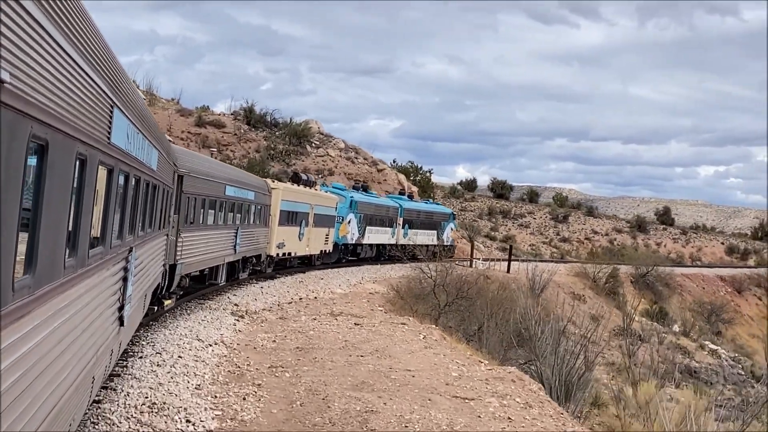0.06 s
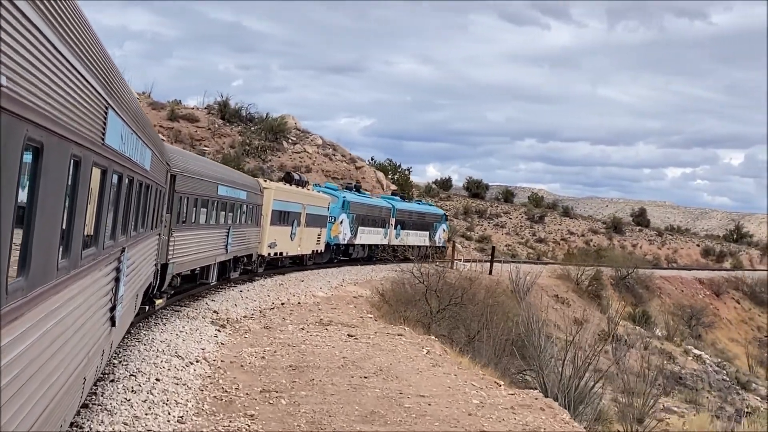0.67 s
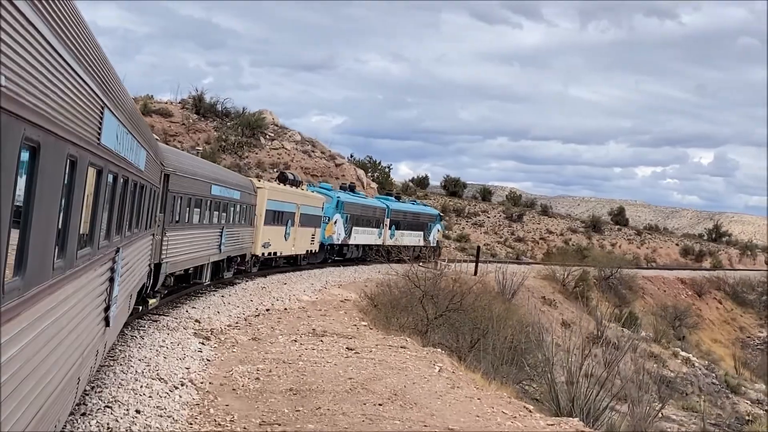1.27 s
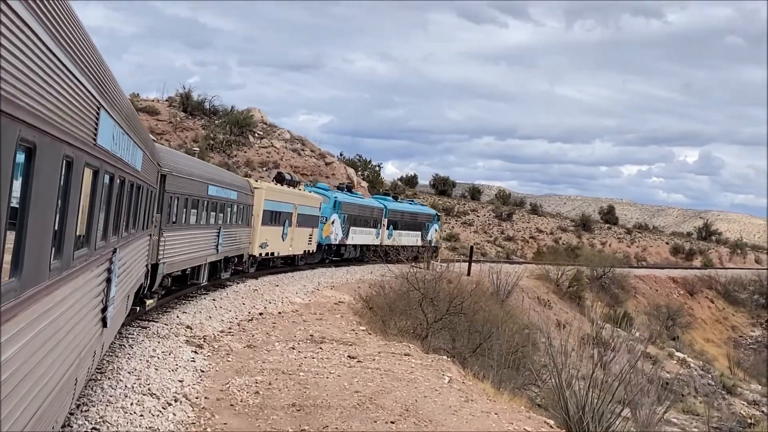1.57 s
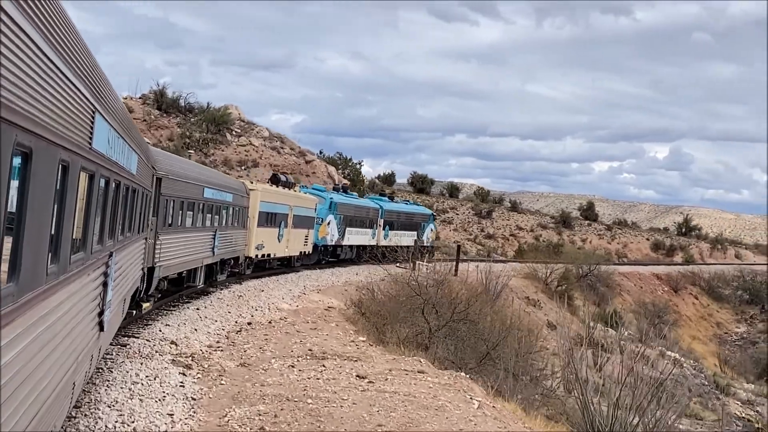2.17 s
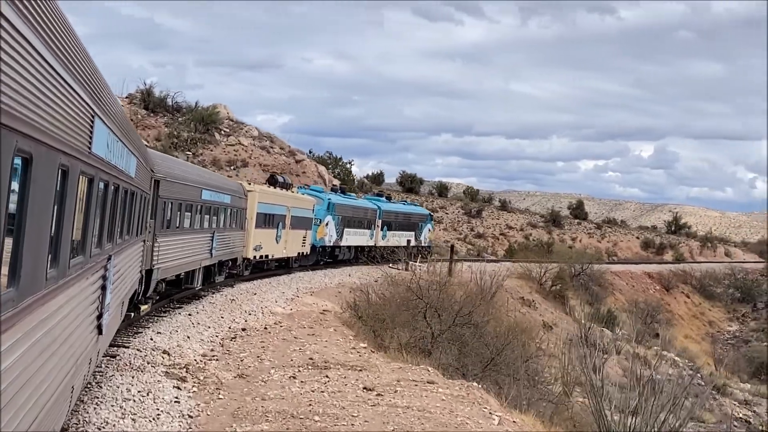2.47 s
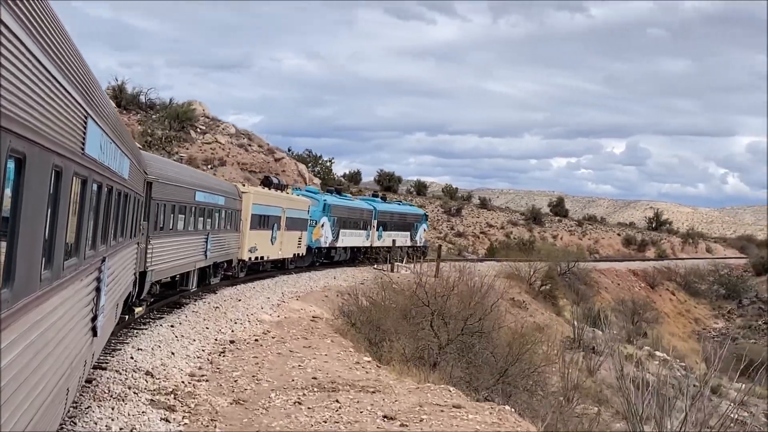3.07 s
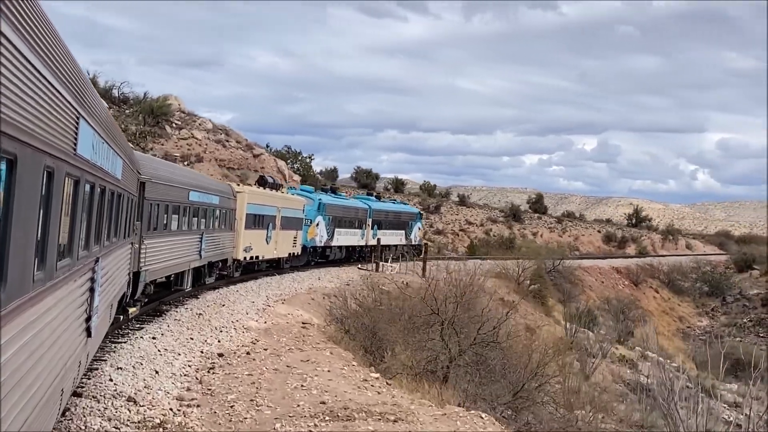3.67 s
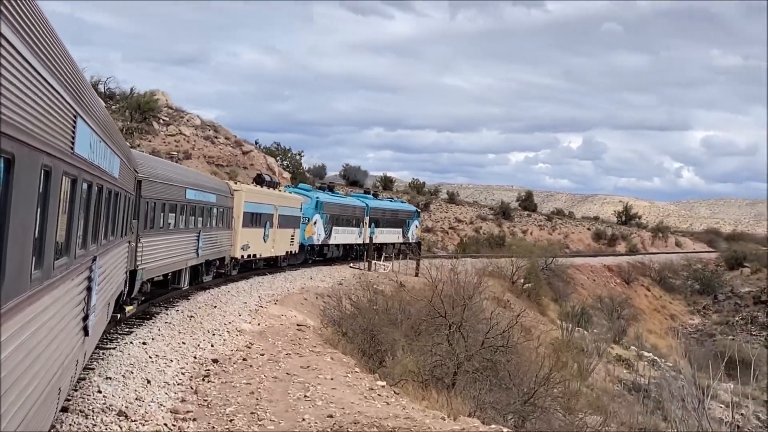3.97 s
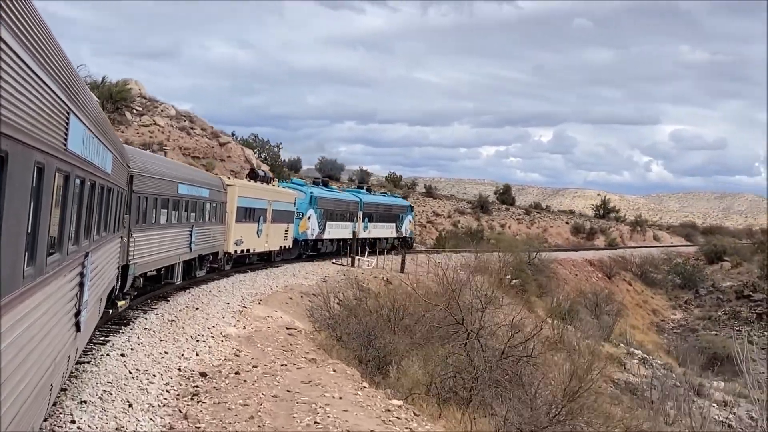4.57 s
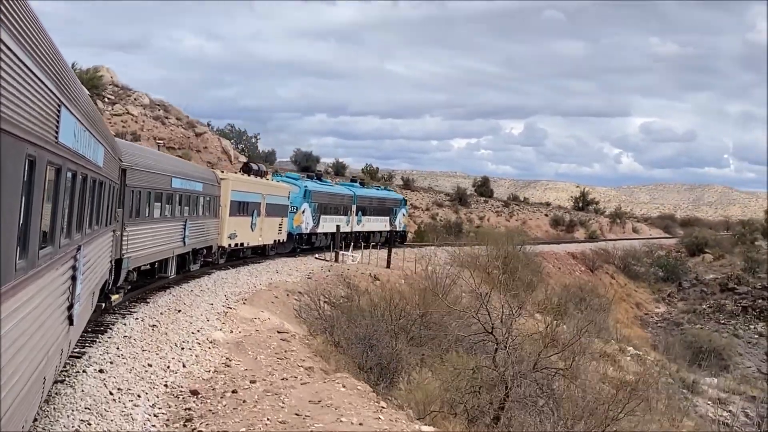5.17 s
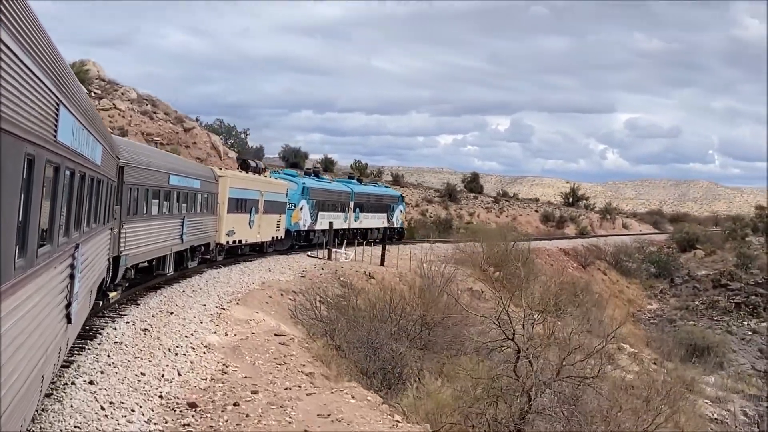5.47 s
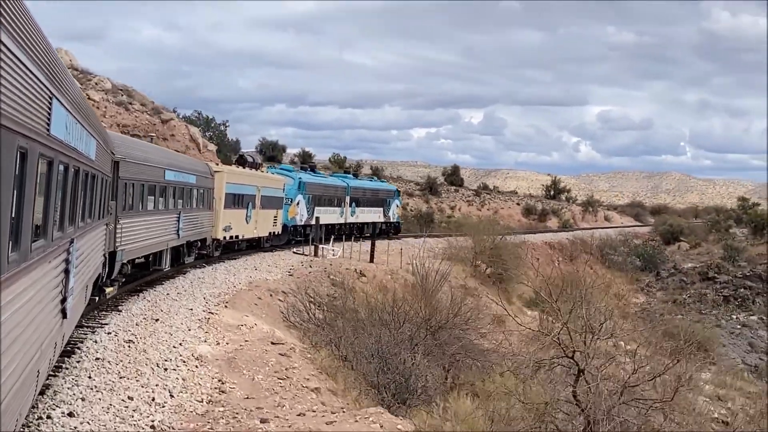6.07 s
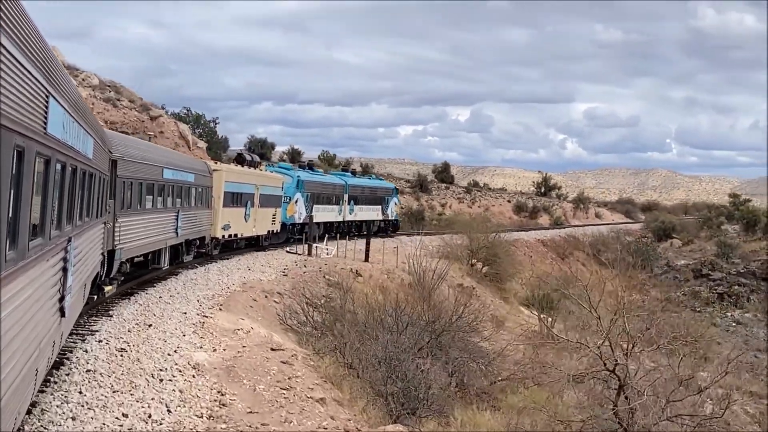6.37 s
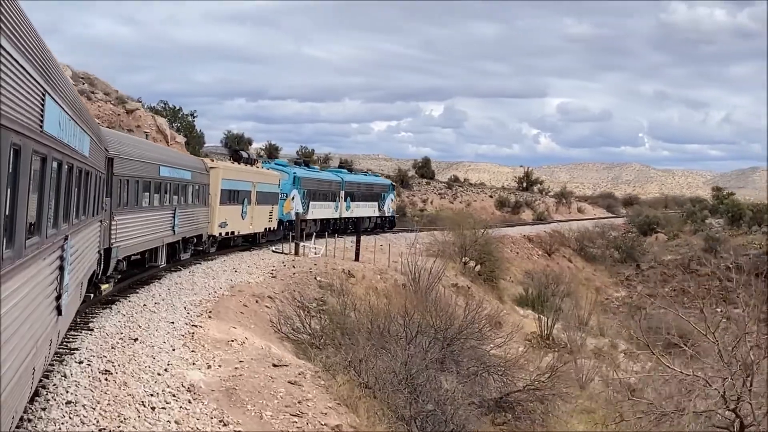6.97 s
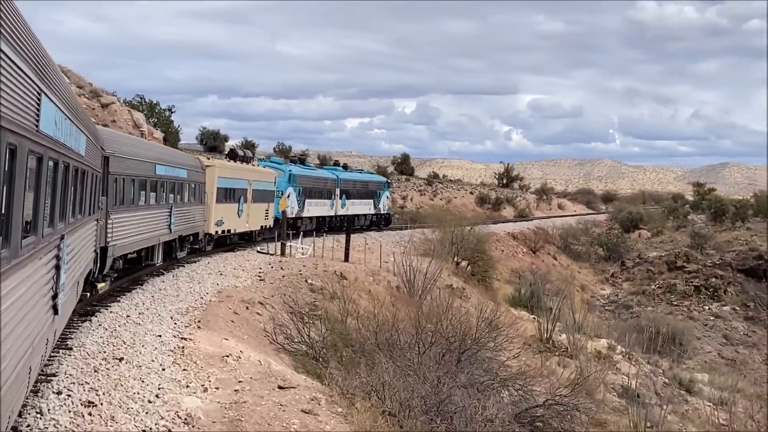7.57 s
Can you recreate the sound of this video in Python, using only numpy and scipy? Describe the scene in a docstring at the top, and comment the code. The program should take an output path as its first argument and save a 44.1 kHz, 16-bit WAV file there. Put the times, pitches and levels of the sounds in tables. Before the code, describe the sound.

A slow passenger train rounds a tight curve in open country, heard leaning out from one of its cars. A loud rush of air swells at the start and dies away. Throughout, a steel wheel squeals at one steady high pitch, fluttering in loudness, with shrill overtones and a faint gritty grinding. Short low groans come and go over the rumble of the cars, and wind buffets the microphone.

```python
"""Train wheels squealing on a curve

A slow passenger train rounds a tight curve in open country, heard leaning out from one of its cars.
A wheel grips and slips on the rail and rings at one steady pitch, heard directly and as ground echoes.
Flanges (the wheels' guiding rims) grind, and a low wheel note groans. A rush of air dies away
at the start; the cars rumble, and wind buffets the microphone."""
import sys
import numpy as np
from scipy import signal
from scipy.fft import rfft, irfft, next_fast_len
from scipy.io import wavfile
from scipy.ndimage import uniform_filter1d

SR = 44100
rng = np.random.default_rng(int(sys.argv[2]) if len(sys.argv) > 2 else 0)


def wav_record(signal):
    """Record a signal, one row per channel, as 16-bit PCM in the file named by sys.argv[1]."""
    frames = np.transpose(np.atleast_2d(signal))
    bounded = np.clip(frames, -1, 1)
    # unit amplitude maps onto the largest positive 16-bit level
    quanta = np.round(bounded * 32767).astype(np.int16)
    wavfile.write(sys.argv[1], SR, quanta)


N = 345303
TIME = np.arange(N) / SR
WHEEL_HZ = 2088.3   # the squealing wheel's main note
USUAL_PRESSURE_DB = -44   # overtone level when the flange presses as usual


def from_db(db):
    """Turn decibels into a gain."""
    return 10 ** (np.asarray(db) / 20)


def rms_one(x):
    """Scale a signal to an average power of 1."""
    return x / np.sqrt(np.mean(np.abs(x) ** 2) + 1e-20)


def in_time(rows):
    """Join a table's points in time: one smooth curve for each column after the first."""
    times, *columns = np.transpose(rows)
    return [np.interp(TIME, times, column) for column in columns]


def at_hz(points, hz):
    """Read a table between its frequencies, with octaves evenly spaced."""
    frequencies, values = np.transpose(points)
    return np.interp(np.log(hz), np.log(frequencies), values)


def hump(centre_s, length_s):
    """A rounded rise and fall of height 1."""
    distance = np.minimum(np.abs(TIME - centre_s) / (.6 * length_s), 4)
    return np.exp(-distance ** 3)


def spells(rows):
    """Loudness curve of events that each swell, hold and fade."""
    return np.sqrt(sum(from_db(db) ** 2 * hump(s, length) for s, length, db in rows) + 1e-18)


def drift(rate_hz, order=2):
    """A random wobble of typical size 1, mostly slower than the given rate."""
    lowpass = signal.butter(order, min(rate_hz, SR / 45), fs=SR / 20, output="sos")
    slow = signal.sosfilt(lowpass, rng.standard_normal(N // 20 + 3002))[3000:]
    return np.interp(np.arange(N) / 20, np.arange(len(slow)), rms_one(slow))


def evened(x, span_s):
    """Take the slow swells out of a sound and keep its fast flutter."""
    power = np.mean(np.abs(np.atleast_2d(x)) ** 2, axis=0)
    return x / np.sqrt(np.maximum(uniform_filter1d(power, int(span_s * SR)), 1e-9))


def stereo_noise(spectrum, side_db, band_hz):
    """Shaped noise: its middle has power 1 inside the band, and side_db sets its width."""
    size = next_fast_len(N)
    hz = np.maximum(np.fft.rfftfreq(size, 1 / SR), 1)
    gain = from_db(at_hz(spectrum, hz))
    gain /= np.sqrt(np.mean(gain ** 2 * (hz > band_hz[0]) * (hz < band_hz[1])))
    mid, side = irfft(rfft(rng.standard_normal((2, size))) * gain, size)[:, :N]
    return mid + from_db(side_db) * side * [[1], [-1]]


def vibration(hz):
    """A steady tone as a turning complex number; its real part is the sound."""
    return np.exp(2j * np.pi * hz * TIME)


def scatter(spread_hz, order=3):
    """A gain that blurs a tone: each echo off the passing ground shifts a little in pitch."""
    return rms_one(drift(spread_hz, order) + 1j * drift(spread_hz, order))


def panned(x, left_db):
    """Make the left side louder than the right."""
    return x * from_db(np.array([[left_db], [-left_db]]) / 2)


def microphone_ports(x):
    """Sound from along the track reaches the microphone's two openings out of step."""
    # how far the left side leads: (frequency [Hz], phase [radians])
    port_phase = [(20, 0), (600, .1), (2090, .69), (3000, -.2), (4200, -.44), (6300, -.69), (7000, .1),
                  (7400, 2), (8400, 2.6), (10000, 3.3), (10600, 4.6), (11200, 6.1), (13200, 6.4),
                  (14400, 9.1), (16000, 9.5)]
    size = next_fast_len(N + 2000)
    lead = at_hz(port_phase, np.maximum(np.fft.rfftfreq(size, 1 / SR), 1))
    return irfft(rfft(x, size) * np.exp(.5j * lead * [[1], [-1]]), size)[:, :N]


def narrow_bass(x, bass_hz=280):
    """The bass draws in to the middle for a while; higher sounds keep their width."""
    # stereo width of the bass: (time [s], side gain [dB])
    width = [(0, -1.5), (1.5, 1), (2.1, -29.5), (5.4, -28.5), (6.6, 1), (7.83, -6)]
    mid, side = (x[0] + x[1]) / 2, (x[0] - x[1]) / 2
    low = signal.sosfilt(signal.butter(4, bass_hz, "low", fs=SR, output="sos"), side)
    high = signal.sosfilt(signal.butter(4, bass_hz, "high", fs=SR, output="sos"), side)
    return mid + (high + from_db(in_time(width)[0]) * low) * [[1], [-1]]


def roll():
    """The rolling wheels make a smooth, low noise."""
    # loudness of the rolling: (time [s], level [dB])
    levels = [(0, -52), (1.0, -49), (2.2, -48.5), (3.2, -47.5), (4.2, -54.5), (6.5, -65), (7.83, -47.5)]
    # its tone colour: (frequency [Hz], level [dB])
    spectrum = [(40, -23), (110, 0.5), (170, 4), (260, 2), (340, -4.5), (520, -18.5), (1000, -34.5),
                (4000, -79.5)]
    return from_db(in_time(levels)[0]) * stereo_noise(spectrum, side_db=-17.5, band_hz=(25, 260))


def rumble(airflow_db, eddies):
    """Air streaming past the train makes a lumpy, low roar, pushed by eddies and thumps."""
    # deep, dull thumps of wind: (centre [s], length [s], level [dB])
    thumps = [(.125, 0.043, -17), (.37, 0.046, -25.5), (.6, 0.042, -33), (.74, .05, -32.5),
              (2.88, .05, -40), (4.05, 0.081, -37), (4.38, .04, -35.5), (4.53, 0.085, -32), (4.8, .05, -34),
              (5.34, 0.051, -25.5), (5.56, 0.053, -32), (6.9, 0.062, -33), (7.59, 0.032, -31.5)]
    # tone colour of the roar: (frequency [Hz], level [dB])
    spectrum = [(12, -47.5), (25, -17.5), (35, -17), (50, 0.5), (65, 2.5), (90, -0.5), (140, -3.5),
                (220, -9), (330, -12.5), (500, -15.5), (900, -49.5), (4000, -94)]
    lumps = from_db(airflow_db - 1.5 + 1.5 * drift(rate_hz=14))
    pushes = np.hypot(spells(thumps), from_db(-4) * eddies)
    return np.hypot(lumps, pushes) * stereo_noise(spectrum, side_db=-7.5, band_hz=(25, 260))


def wind(airflow_db, eddies):
    """Each eddy tears briefly at the microphone, over a weaker flutter."""
    # tone colour of the wind: (frequency [Hz], level [dB])
    spectrum = [(15, -39.5), (40, -23.5), (90, 0), (250, 2), (420, 1.5), (650, 2.5), (880, -0.5),
                (1150, -7.5), (1450, -15.5), (1800, -24.5), (3000, -44), (8000, -86.5)]
    breeze = from_db(airflow_db - 12.5 + 3.5 * drift(rate_hz=28))
    tearing = evened(from_db(2.9 * drift(rate_hz=330)), span_s=0.07)
    level = np.hypot(breeze, from_db(0.8) * eddies) * tearing
    return level * stereo_noise(spectrum, side_db=-5.5, band_hz=(520, 1500))


def rush(right_lead_s=-.00017):
    """Air roars up along the cars and dies away; it reaches the left side first."""
    # loudness of the rush: (time [s], level [dB])
    levels = [(.03, -59), (.09, -31.5), (.19, -22), (.36, -17.5), (.62, -26), (1.2, -30.5), (2.25, -37.5),
              (2.55, -46), (2.9, -68)]
    # its tone colour: (frequency [Hz], level [dB])
    spectrum = [(30, -26), (120, -12), (250, -11), (450, -7), (700, -3.5), (950, -0.5), (1200, 1),
                (1550, -4), (1950, -8.5), (2500, -9.5), (3300, -25.5), (4500, -38), (7000, -51.5),
                (15000, -82)]
    level = from_db(in_time(levels)[0] + 2.0 * drift(rate_hz=20))
    left, right = level * stereo_noise(spectrum, side_db=-11, band_hz=(520, 1850))
    return np.array([left, np.interp(TIME + right_lead_s, TIME, right)])


def ticks(decay_s=.004, lowest_hz=5000):
    """Grit makes small, bright clicks that die away at once."""
    # clicks of grit: (time [s], level [dB])
    clicks = [(1.847, -49), (5.235, -47)]
    level = sum(from_db(db) * (TIME > s) * np.exp(-np.abs(TIME - s) / decay_s) for s, db in clicks)
    highpass = signal.butter(2, lowest_hz, "high", fs=SR, output="sos")
    return signal.sosfilt(highpass, level * rng.standard_normal(N) + 1e-18)


def grind(grit_db=2.06):
    """The steel flange rubs on the rail with a gritty hiss."""
    # steady rubbing: (time [s], relative level [dB])
    levels = [(0, -57), (.45, -55.5), (1.05, -62.5), (1.4, -59), (1.9, -61.5), (2.12, -53), (2.55, -65.5),
              (3.15, -58.5), (3.6, -64.5), (3.8, -59), (4.25, -58.5), (4.7, -57), (5.12, -60), (5.45, -56),
              (6.2, -64), (6.65, -58), (7.3, -58.5), (7.83, -60.5)]
    # harder scrapes: (centre [s], length [s], level [dB])
    scrapes = [(.72, 0.043, -63), (.98, 0.097, -60), (3.73, 0.069, -59.5), (5.565, 0.077, -56.5),
               (6.68, .03, -68), (7.74, 0.04, -56)]
    # tone colour of the hiss: (frequency [Hz], level [dB])
    spectrum = [(900, 4.5), (1800, 6), (2500, 6.5), (3200, -0.5), (3700, 1.5), (4800, -3.5), (6000, -6.5),
                (7800, -6), (9500, -28), (11500, -13.5), (13500, -16.5), (15000, -20.5)]
    rubbing = np.hypot(from_db(in_time(levels)[0] - 2.06), spells(scrapes))
    grit = from_db(grit_db * drift(rate_hz=42))
    return rubbing * grit * stereo_noise(spectrum, side_db=-8, band_hz=(3350, 3900))


def groan(pitch_hz=416.0, floor_db=-57.5):
    """The wheel's lowest note sounds in short, wavering spells."""
    # groans: (centre [s], length [s], level [dB])
    groans = [(.78, 0.32, -43), (1.07, 0.12, -37.5), (2.18, 0.2, -43), (3.2, 0.27, -45.5), (3.82, .2, -43),
              (4.5, 0.21, -45.5), (4.86, 0.15, -29.5), (5.01, .06, -30.5), (5.36, 0.13, -32),
              (5.6, .22, -41.5), (6.32, 0.16, -38)]
    wavering = np.exp(.7j * drift(rate_hz=6.5)) + 0.83 * scatter(spread_hz=23)
    tone = evened(vibration(pitch_hz) * wavering, span_s=0.055).real
    return (spells(groans) + from_db(floor_db)) * np.sqrt(2) * tone


def ring(rise_s=.02):
    """A thin, high wheel note catches once and rings on, blurred by ground echoes."""
    # the note: (start [s], pitch [Hz], level [dB], time to fade by 60 dB [s])
    note = (1.22, 5270, -54, 2.6)
    start, hz, db, fade = note
    level = from_db(db - 60 * np.abs(TIME - start) / fade) * np.clip((TIME - start) / rise_s, 0, 1)
    return level * np.sqrt(2) * (vibration(hz) * scatter(spread_hz=70)).real


def chirp():
    """Another wheel note catches briefly and rises with its octave, blurred by ground echoes."""
    # path of the chirp: (time [s], pitch [Hz], relative level [dB])
    path = [(6.0, 3000, -75), (6.04, 3020, -63), (6.068, 3030, -45), (6.09, 3090, -47), (6.13, 3030, -57),
            (6.17, 3110, -74)]
    hz, level_db = in_time(path)
    glide = np.exp(2j * np.pi * np.cumsum(hz) / SR)
    note = glide * evened(scatter(spread_hz=130), span_s=.03)
    octave = from_db(-6) * glide ** 2 * evened(scatter(spread_hz=100), span_s=0.027)
    sounding = (TIME > path[0][0]) * (TIME < path[-1][0])
    return from_db(level_db + 3.0) * (note + octave).real * sounding


def echoed_tones(rows, spread_hz):
    """Multiples of the wheel's note arrive only as echoes; higher ones are more blurred."""
    out = np.zeros(N)
    for multiple, level_db in rows:
        blur = evened(scatter(spread_hz * multiple), span_s=0.15)
        out += from_db(level_db) * np.sqrt(2) * (blur * vibration(multiple * (WHEEL_HZ + 7))).real
    return out


def shrill(pressure_db, rasp_floor_db=-30.5):
    """Harder pressure sharpens the slips into overtones; when every other slip is weaker, they rasp."""
    # overtones of the squeal: (pitch multiple, relative level [dB])
    overtones = [(2, -0.5), (3, -7.5), (4, -13), (5, -20), (6, -22), (7, -27)]
    # boost of the top overtones: (time [s], gain [dB])
    top_boost = [(0, 2.5), (.8, -2), (1.25, 2.5), (1.7, -2.5), (2.35, 2), (3.1, 3.5), (3.9, -3.5), (4.4, 0),
                 (4.9, 1.5), (5.35, -4), (5.75, 1), (7.83, -0.5)]
    # rasping tones halfway between the overtones: (pitch multiple, relative level [dB])
    half_tones = [(.5, -1.5), (1.5, 4), (2.5, -1.5), (3.5, -7), (4.5, -10), (5.5, -11.5)]
    # spells of rasping: (centre [s], length [s], level [dB])
    rasps = [(1.25, 0.057, -51), (2.07, 0.044, -60), (2.36, 0.079, -55), (2.8, .05, -57.5),
             (3.03, .14, -54.5), (3.3, 0.15, -55), (4.7, .27, -56.5), (5.03, 0.07, -56), (5.28, 0.059, -63),
             (5.56, .1, -64)]
    level = from_db(USUAL_PRESSURE_DB + pressure_db + 2.0 * drift(rate_hz=8.4))
    rasp_level = np.hypot(spells(rasps), from_db(rasp_floor_db) * level)
    lower = echoed_tones(overtones[:2], spread_hz=37.6)
    upper = from_db(in_time(top_boost)[0]) * echoed_tones(overtones[2:], spread_hz=35)
    return level * (lower + upper) + rasp_level * echoed_tones(half_tones, spread_hz=38)


def squeal(pressure_db, second_wheel_hz=2077.0):
    """The wheel rides with the listener, so its pitch is steady; ground echoes make it flutter."""
    # ground echoes against the direct tone: (time [s], relative level [dB])
    echo_levels = [(0, -6.5), (.8, 2.5), (1.5, -7), (2.3, -8.5), (3.4, -2), (3.9, -0.5), (5.0, -0.5),
                   (5.6, 11), (6.1, -9), (6.8, 0.5), (7.2, -2), (7.83, 2)]
    # the squeal briefly swells or fades: (centre [s], length [s], level change [dB])
    swells = [(0, 0.035, -10), (0.166, 0.035, 8), (0.247, .04, 5.5), (0.427, 0.03, 9.5), (0.563, 0.22, -3),
              (1.024, 0.028, -9), (1.106, 0.1, 1), (1.616, 0.041, 5), (1.837, 0.034, 5), (2.291, 0.11, 6),
              (2.557, 0.26, -4), (3.031, 0.039, 4), (3.4, 0.052, 8.5), (3.672, .08, -6), (4.646, 0.15, 2.5),
              (5.437, 0.18, -3.5), (5.53, .025, 6), (5.622, 0.011, 3), (5.711, 0.01, 16.5),
              (5.97, 0.076, -11.5), (6.424, .16, 2.5), (7.2, 0.12, 5), (7.731, .16, -5)]
    swell_db = sum(db * hump(s, length) for s, length, db in swells)
    # the note is near its limit, so extra pressure adds little
    level_db = -22 + np.where(pressure_db > 0, 0.18, 0.36) * pressure_db + swell_db
    # the squeal flutters in loudness and sometimes dips briefly
    flutter_db = 1.1 * drift(rate_hz=17.7)
    dip_db = 5 * np.maximum(drift(rate_hz=30) - 1, 0)
    direct = vibration(WHEEL_HZ) * np.exp(.25j * drift(rate_hz=2.8))
    # a second wheel, a little lower, beats against the first
    neighbour = from_db(-6) * vibration(second_wheel_hz) * scatter(spread_hz=2.75)
    # echoes come from all round, so left and right differ a little
    sideways = .3 * scatter(spread_hz=42, order=4) * [[1], [-1]]
    echoes = vibration(WHEEL_HZ + 5) * (scatter(spread_hz=39.5, order=4) + sideways)
    wide_blur = from_db(-22) * vibration(WHEEL_HZ) * scatter(spread_hz=140, order=2)
    # the many echo paths smooth out quick swells
    echo_gain = from_db(in_time(echo_levels)[0] - .5 * swell_db)
    tone = from_db(flutter_db - dip_db) * (direct + neighbour + echo_gain * (echoes + wide_blur))
    return from_db(level_db) * np.sqrt(2) * evened(tone, span_s=0.12).real


def scene():
    """Mix the wheels and air along the train with rumble and wind at the microphone."""
    # how hard the flange presses on the rail: (time [s], overtone level [dB])
    pressure = [(0, -66), (.22, -44), (.4, -39), (.6, -42.5), (1.15, -40.5), (1.42, -50), (1.65, -39),
                (1.8, -51.5), (2.3, -38.5), (2.6, -52.5), (2.8, -44.5), (3.25, -43.5), (3.66, -49.5),
                (3.85, -40), (4.35, -39), (4.85, -46.5), (5.16, -57), (5.33, -39.5), (5.55, -37),
                (6.2, -67.5), (6.45, -44), (6.93, -48), (7.55, -38), (7.83, -43)]
    # strength of the passing air: (time [s], relative level [dB])
    airflow = [(0, -34.5), (.15, -25.5), (.55, -34), (.95, -40.5), (1.9, -42), (2.25, -38.5), (2.7, -48),
               (3.3, -41.5), (4.2, -42), (4.6, -37), (5.2, -30), (5.85, -40.5), (6.15, -38), (6.6, -40),
               (7.1, -41), (7.45, -37.5), (7.83, -34.5)]
    # eddies (swirls of air) hitting the microphone: (centre [s], length [s], relative level [dB])
    buffets = [(0.127, 0.011, -20.5), (0.188, 0.045, -24), (0.315, 0.0095, -20), (0.425, 0.02, -24),
               (1.797, 0.043, -37.5), (3.358, 0.016, -40.5), (3.435, 0.02, -47.5), (3.572, 0.027, -36.5),
               (3.65, 0.038, -39), (3.806, 0.031, -39), (3.894, 0.021, -40), (4.45, 0.029, -38.5),
               (4.526, 0.0088, -31), (4.66, 0.0085, -38), (4.874, 0.036, -38.5), (4.934, 0.017, -41),
               (4.987, 0.017, -26), (5.04, 0.0061, -26), (5.096, 0.04, -31), (5.162, 0.052, -33.5),
               (5.337, 0.048, -33.5), (5.392, 0.02, -28), (5.565, 0.083, -44), (5.72, 0.048, -35.5),
               (5.911, 0.04, -35.5), (6.01, 0.089, -40), (6.128, 0.028, -37.5), (6.21, 0.085, -41),
               (6.884, 0.016, -36.5), (7.149, 0.057, -39.5), (7.255, 0.067, -42), (7.364, 0.035, -34),
               (7.455, 0.02, -32), (7.58, 0.016, -37.5), (7.801, 0.015, -29.5)]
    pressure_db = in_time(pressure)[0] - USUAL_PRESSURE_DB
    airflow_db, eddies = in_time(airflow)[0], spells(buffets)
    wheels = panned(squeal(pressure_db), left_db=4.0) + chirp() + ring() + shrill(pressure_db) + grind()
    background = panned(rush(), left_db=3.0) + rumble(airflow_db, eddies) + roll()
    background += wind(airflow_db, eddies)
    return narrow_bass(microphone_ports(wheels) + groan() + ticks() + background)


def record(dry):
    """Cut the treble steeply above 15000 Hz."""
    return signal.sosfilt(signal.ellip(10, .1, 90, 15000, fs=SR, output="sos"), dry)


dry = scene()
out = record(dry)
wav_record(out)
```